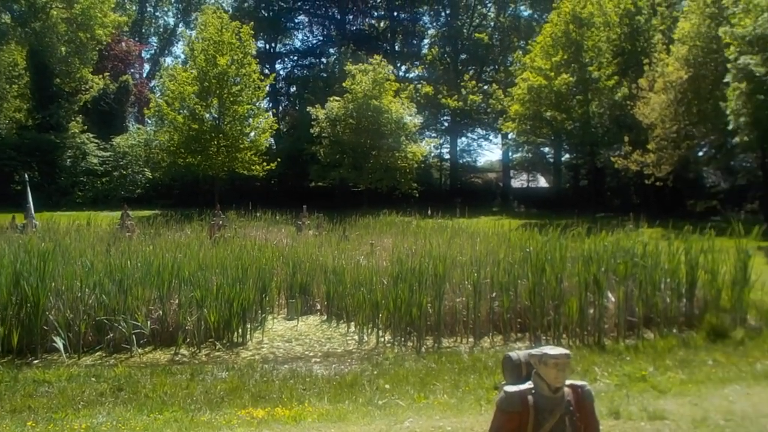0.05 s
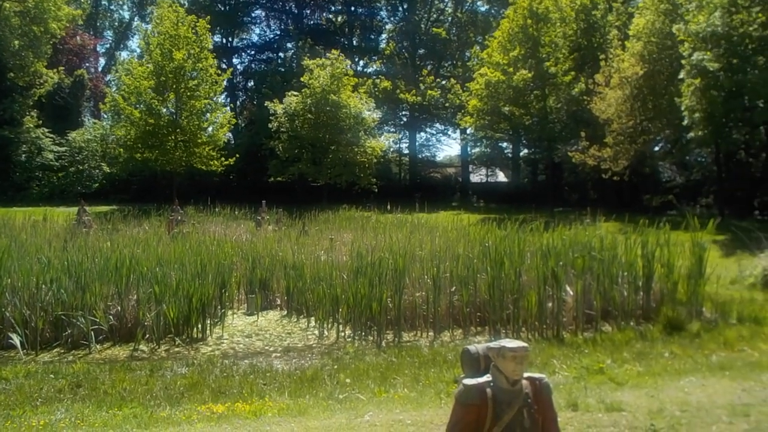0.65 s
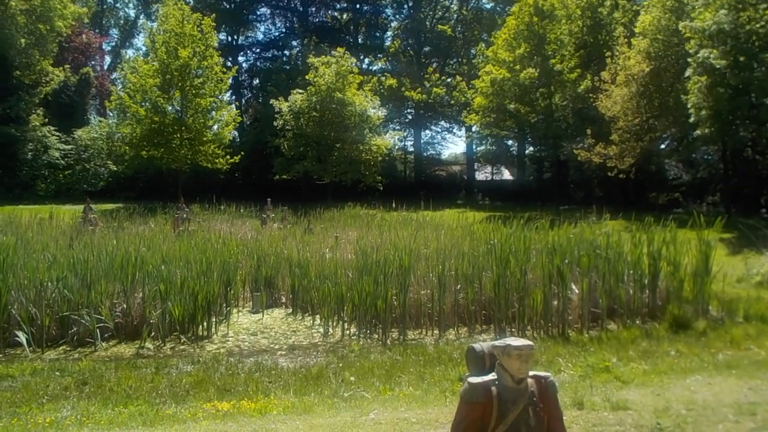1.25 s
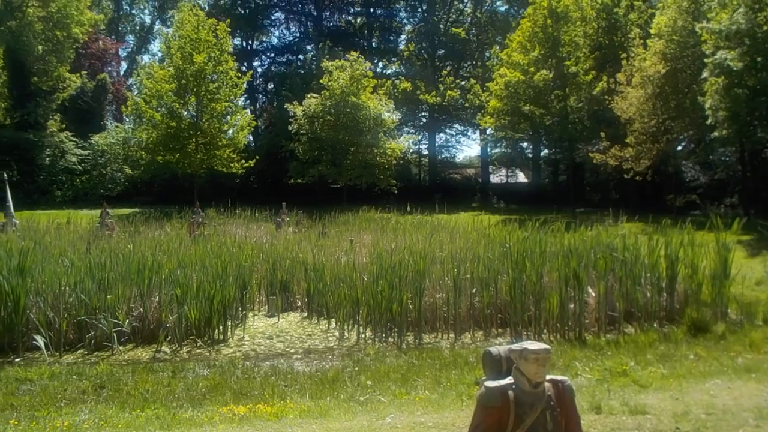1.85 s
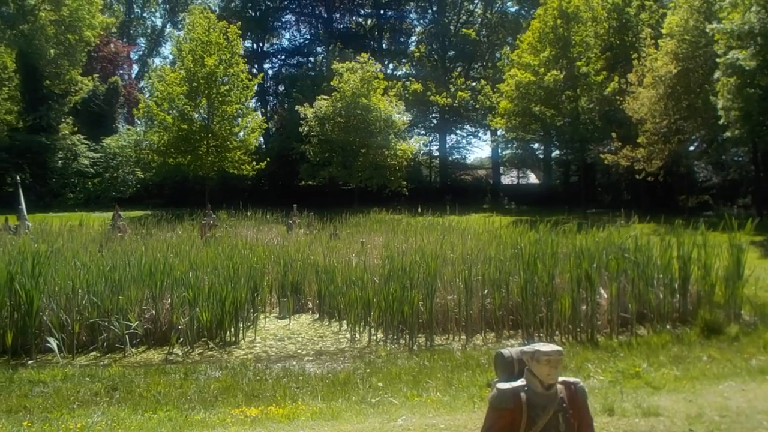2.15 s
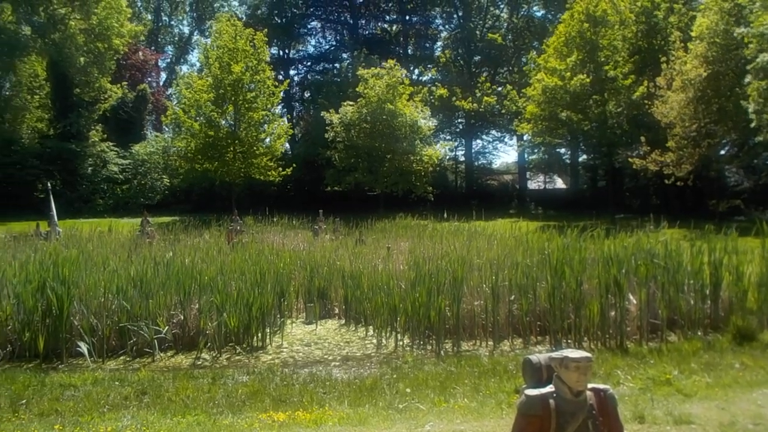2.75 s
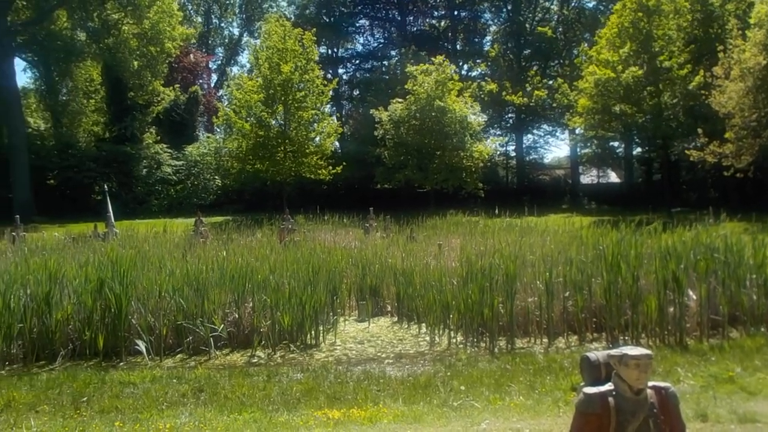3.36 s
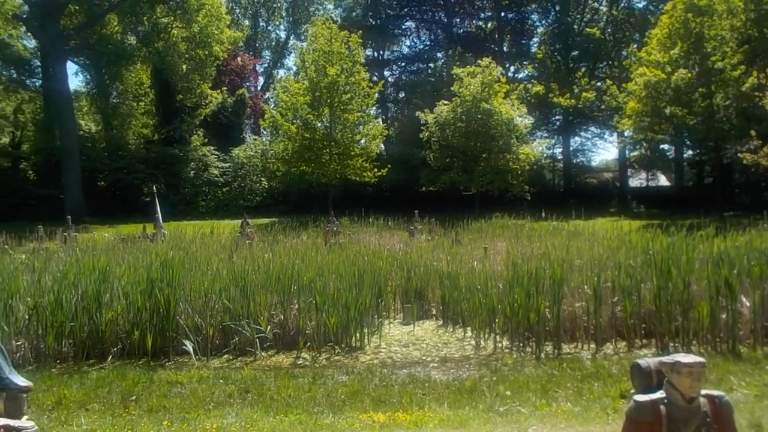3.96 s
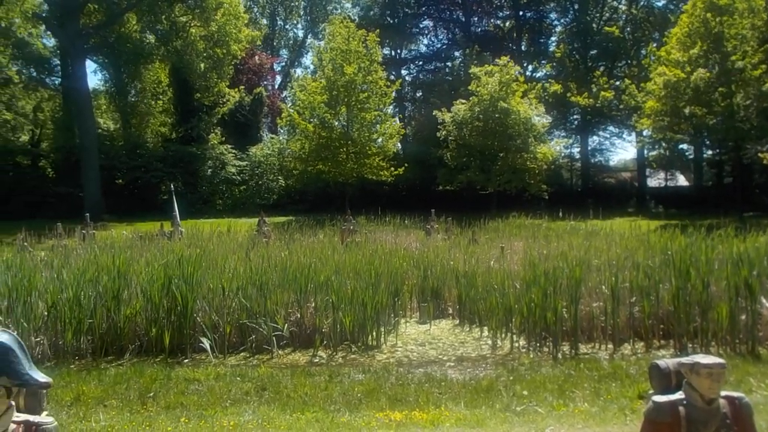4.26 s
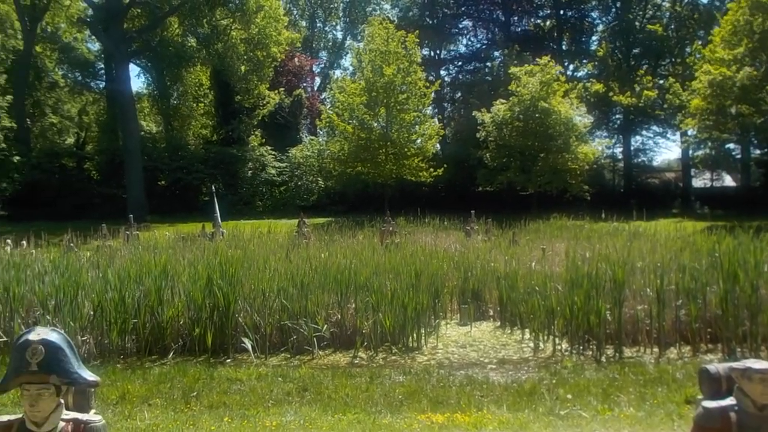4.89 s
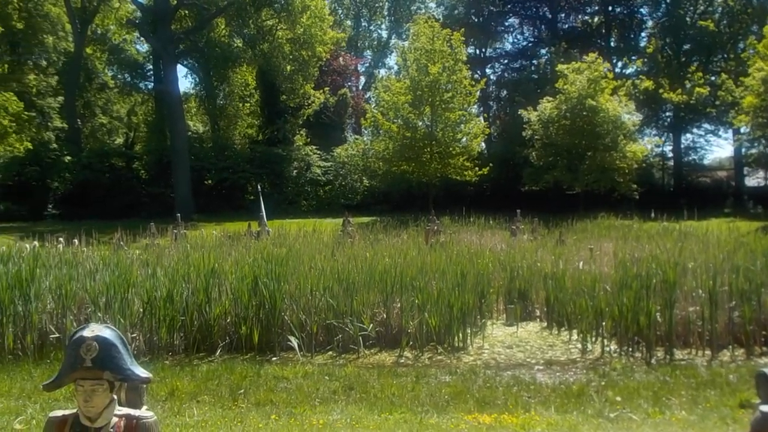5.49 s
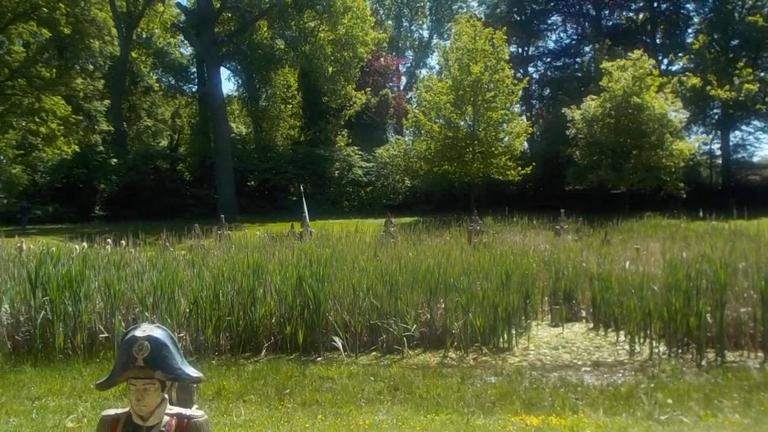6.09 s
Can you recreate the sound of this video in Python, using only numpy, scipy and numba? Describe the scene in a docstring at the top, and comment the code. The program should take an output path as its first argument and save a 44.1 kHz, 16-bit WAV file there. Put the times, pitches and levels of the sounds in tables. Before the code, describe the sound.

Short frog croaks and clicking calls come from the reeds, with a few dry snaps and faint birdsong in the trees.

```python
"""Frogs at a park pond

Frogs croak in the reeds: trains of larynx pulses that slow as the ring of the vocal sac rises.
Lone pulses come out as clicks, and a few dry snaps crack close by. In the trees behind, small birds
give sliding whistles, louder arched calls and faint twitter. Reeds and tree line scatter every call
over a bed of distant wash and microphone hiss."""
import sys
import numpy as np
from scipy import signal
from scipy.fft import rfft, irfft
from scipy.io import wavfile
from scipy.ndimage import uniform_filter1d
from numba import njit

SR = 44100
rng = np.random.default_rng(int(sys.argv[2]) if len(sys.argv) > 2 else 0)


def transcribe(signal):
    """Save signal, clipped to [-1, 1], as a 16-bit WAV file at the path in sys.argv[1]."""
    frames = np.atleast_2d(signal).T
    limited = np.clip(frames, -1, 1)
    pcm = np.round(limited * 32767).astype(np.int16)
    wavfile.write(sys.argv[1], SR, pcm)


N = 270342

# Frog croaks. Each row: crest in seconds, swell and fade in seconds, level in dB, pulse rate and sac
# ring at the crest in Hz, rise of the ring either side of it in octaves, drop within each throb in dB.
CROAKS = [(.006, .04, 0.025, -35.5, 403, 1354, 0.38, 0.5), (.441, .055, 0.031, -45, 268.5, 1340, 0.32, 1),
          (1.057, .045, 0.094, -44, 440, 1440, .27, 24), (1.842, .075, 0.046, -47, 300.4, 1270, .26, 0),
          (2.096, .046, .017, -46.5, 258, 1430, .35, 2), (2.452, .15, 0.043, -52.5, 128.9, 1440, .2, 6),
          (4.047, .005, 0.017, -42.5, 386.5, 1150, 0.31, -4),
          (4.096, 0.028, 0.028, -36.5, 384.4, 1367, .42, 2),
          (4.772, .072, 0.069, -44, 330.4, 1325, 0.27, 5.5), (5.093, .03, 0.017, -42.5, 568, 966, 0.057, 3)]
# Lone frog clicks. Each row: start in seconds, relative peak in dB, sac ring in Hz.
CLICKS = [(0.9502, -42, 1960), (1.1255, -41, 1650), (1.1364, -34.5, 1610), (1.1952, -41.5, 1910),
          (1.2615, -39, 1570), (2.1281, -38.5, 1520), (2.164, -31.5, 1550), (2.1968, -33.5, 1430),
          (2.3033, -35.5, 1540), (2.3994, -43, 1480), (2.4952, -39.5, 1560), (2.5142, -40.5, 1530),
          (2.575, -42.5, 1570), (2.6504, -44.5, 1610), (2.7124, -38.5, 1560), (2.7681, -42.5, 1610),
          (2.801, -38.5, 1490), (4.1232, -38, 1560)]
# Close, dry snaps. Each row: start in seconds, relative level in dB, treble lift in dB.
SNAPS = [(0.8151, 12.5, -16), (0.8159, 4.5, -5.5), (.8185, -18, -6), (.837, -1, -9), (.872, 3.5, -17),
         (0.8743, 6.5, -29), (1.0945, -10.5, -3), (1.0995, -12, 3.5)]
# The body of a snap. Each row: resonance in Hz, width in Hz, gain in dB.
SNAP_MODES = [(1630, 110, -11), (1880, 88, 1.5), (3040, 300, -3), (3500, 430, -16), (4200, 250, -4),
              (5200, 120, -2.5), (6160, 300, -36)]
# Arched calls of a nearer bird. Each row: start and length in seconds, top pitch in Hz,
# relative level in dB, warble from 0 to 1.
ARCHES = [(4.017, 0.097, 4380, -47, 0.72), (4.225, .104, 4236, -47.5, 0.69), (4.439, .09, 4586, -53, 0.27),
          (6.074, 0.14, 4290, -48, 0.71)]
# Sliding whistles. Each row: start and length in seconds, landing pitch in Hz, relative level in dB,
# opening pitch in octaves above the landing, warble from 0 to 1.
WHISTLES = [(0, 0.032, 4230, -57, 0.013, 0.3), (.004, .022, 4730, -60.5, .02, .4),
            (0.076, 0.03, 4240, -57.5, -.14, 0.23), (0.194, .13, 4060, -69.5, .01, 0.22),
            (0.883, 0.051, 4610, -59.5, -.2, 0.04), (1.031, 0.11, 4610, -64.5, .2, .15),
            (1.134, 0.072, 4270, -59, -.17, 0.13), (1.25, 0.096, 4705, -64.5, -0.02, 0.11),
            (1.38, .082, 4270, -63, -.24, 0.02), (2.336, 0.058, 3346, -64, 0.017, .1),
            (2.389, 0.215, 4245, -62, -0.055, 0.05), (2.669, 0.094, 3100, -70.5, 0.06, 0.37),
            (2.74, 0.17, 2650, -72.5, 0.034, 0.04), (3.068, 0.043, 3740, -62, 0.24, 0.88),
            (3.264, .018, 4480, -63, 0.107, .1), (3.276, 0.06, 3430, -58.5, 0.054, 0.94),
            (3.3, 0.23, 1916, -65, .12, 0.53), (3.451, 0.053, 2790, -63.5, .23, .8),
            (3.554, 0.058, 4450, -66.5, -0.0061, 0.88), (3.819, 0.073, 2243, -59, -0.084, 0.1),
            (4.464, 0.089, 4550, -54, -.01, 0.3), (4.622, 0.13, 3900, -63, -.06, 0.82),
            (4.834, 0.092, 5590, -68.5, 0.066, 0.66), (4.968, 0.066, 5450, -59.5, 0.14, 0.8),
            (5.053, 0.093, 3880, -63.5, 0.16, 0.45), (5.233, 0.059, 5840, -61, 0.033, .1),
            (5.546, 0.041, 6620, -64, 0.059, 0.6)]
# Bouts of twitter deep in the wood. Each row: start and length in seconds, centre pitch in Hz,
# spread either way in Hz, reverb send in dB.
TWITTER = [(0, 0.18, 4490, 347, -75), (0.948, 0.5, 4600, 600, -83), (2.1, 1.5, 4315, 548, -75),
           (3.6, 0.53, 4380, 463, -67), (4.03, 0.17, 4530, 403, -57.5), (4.28, 0.17, 3840, 652, -57),
           (4.448, 0.45, 3973, 673, -63), (4.851, 1.1, 4325, 700, -65.5), (4.8, .6, 5900, 810, -65.5),
           (5.5, 0.2, 6190, 800, -64)]
# Tone of the distant wash. Each row: frequency in Hz, relative level in dB.
WASH_EQ = [(25, -40), (60, -35.5), (110, -30.5), (200, -22), (310, -13.5), (480, -3.5), (720, 2.5),
           (1050, -0.5), (1550, -12.5), (2200, -11.5), (2700, -25.5), (4400, -20), (6200, -31),
           (9000, -45.5)]
# Tone of the microphone hiss. Each row: frequency in Hz, relative level in dB.
HISS_EQ = [(1000, -41), (6500, -4), (8200, -28.5), (8800, -4), (10000, -0.5), (15500, 2)]
# Treble notch of the recorder. Each row: frequency in Hz, gain in dB.
RECORDER_EQ = [(6300, 0), (7000, -9.5), (7500, -19), (8100, -8.5), (8700, -6), (9500, -2)]

SAC_RISE_S = 0.055  # the sac tightens over about this time either side of the crest
SLOWING = 1.8  # octaves the pulse rate falls for each octave the ring rises
ROUGH_HZ, THROB_HZ = 115, 31.26  # pulse rate at which a croak is fully rough; throbs per second
WARBLE_HZ, WARBLE_DEPTH = 33, 0.0587  # vibrato rate; full depth as a share of the pitch


def croaks():
    """Each croak swells, throbs and fades; the tightening sac rings higher as pulses slow and roughen."""
    out = np.zeros(N)
    for crest_s, swell_s, fade_s, db, rate_hz, sac_hz, rise_oct, throb_db in CROAKS:
        t = np.arange(-int(2 * swell_s * SR), int(2 * fade_s * SR)) / SR
        jitter, shimmer = rng.standard_normal((400, 2)).T  # timing and strength of each pulse
        tension = rise_oct * np.tanh(t / SAC_RISE_S)
        pulse_hz = rate_hz * 2 ** (-SLOWING * tension)
        cycles = np.cumsum(pulse_hz) / SR
        beats = np.arange(min(int(cycles[-1]), len(jitter)))
        rough = np.minimum(ROUGH_HZ / np.interp(beats, cycles, pulse_hz), 1) ** 1.5
        onsets = np.interp(beats + 0.36 * rough * jitter[beats], cycles, np.arange(len(t))).astype(int)
        pulses = np.zeros(len(t))
        pulses[onsets] = undb(8.1 * rough * shimmer[beats])
        throb = undb(-throb_db * (THROB_HZ * t % 1))  # sawtooth tremolo
        voice = vocal_sac(pulses * throb, sac_hz * 2 ** tension,
                          width_hz=148, upper_ratio=1.64, upper_db=-15, throat_db=-14)
        envelope = np.exp(-1.3 * (t / np.where(t < 0, swell_s, fade_s)) ** 2)
        add(out, crest_s + t[0], undb(db) * unit(voice * envelope) * np.sqrt(np.mean(envelope ** 2)))
    return out


def clicks(gain_db):
    """Lone larynx pulses ring the sac for a few milliseconds."""
    out = np.zeros(N)
    pulse = signal.unit_impulse(SR // 40)
    for start, db, hz in CLICKS:
        click = vocal_sac(pulse, hz, width_hz=235, upper_ratio=1.584, upper_db=-6, throat_db=-10)
        add(out, start, undb(db + gain_db) * click / np.abs(click).max())
    return out


def vocal_sac(pulses, hz, width_hz, upper_ratio, upper_db, throat_db):
    """The frog's resonator: a main ring, a weaker mode above it and a throat resonance below."""
    upper = undb(upper_db) * ring(pulses, np.minimum(upper_ratio * hz, 2250), 170)
    throat = undb(throat_db) * ring(pulses, 594, 180)
    voice = ring(pulses, hz, width_hz) - upper - throat
    return signal.sosfilt(signal.butter(4, [300, 2500], "bandpass", fs=SR, output="sos"), voice)


def snaps(gain_db, crack_s, crack_db, lowpass_hz):
    """Dry snaps so close that each channel gets its own crack, ringing a few well-damped modes."""
    out = np.zeros((2, N))
    t = np.arange(SR // 30) / SR
    for channel in out:
        for start, db, treble_db in SNAPS:
            grit = undb(crack_db) * rng.standard_normal(len(t)) * np.exp(-t / crack_s)
            crack = signal.unit_impulse(len(t)) + grit
            body = sum(undb(mode_db + treble_db * (hz > 2500)) * ring(crack, hz, width_hz)
                       for hz, width_hz, mode_db in SNAP_MODES)
            add(channel, start, undb(db + gain_db) * body)
    return signal.sosfilt(signal.butter(3, lowpass_hz, fs=SR, output="sos"), out)


def arched_calls(rise_s, fall_s, sweep_oct, db_per_oct):
    """A warbling call sweeps up, holds at the top, where it is loudest, and sweeps down again."""
    out = np.zeros(N)
    for start, length, top_hz, db, warble in ARCHES:
        t = np.arange(int(length * SR)) / SR
        arch = np.minimum(t / rise_s, (length - t) / fall_s)
        below_oct = sweep_oct * (1 - np.minimum(arch, 1))
        add(out, start, undb(db - db_per_oct * below_oct) * syrinx(top_hz * 2 ** -below_oct, warble))
    return out


def whistles(rise_curve, fall_curve):
    """Each whistle slides onto its pitch: a quick scoop up, or a fall that takes the whole note."""
    out = np.zeros(N)
    for start, length, landing_hz, db, slide_oct, warble in WHISTLES:
        curve = rise_curve if slide_oct < 0 else fall_curve
        bend_oct = slide_oct * np.linspace(1, 0, int(length * SR)) ** curve
        add(out, start, undb(db) * syrinx(landing_hz * 2 ** bend_oct, warble))
    return out


def syrinx(hz, warble):
    """A bird's voice: a soft-edged sine on a pitch path, with a slightly unsteady vibrato."""
    t = np.arange(len(hz)) / SR
    vibrato = np.cos(2 * np.pi * WARBLE_HZ * t) + drift(400, SR // 2)[:len(t)] / 3
    phase = 2 * np.pi * np.cumsum(hz * (1 + warble * WARBLE_DEPTH * vibrato)) / SR
    return np.sqrt(2) * signal.windows.tukey(len(t), 0.3) * np.sin(phase)


def twitter(chirps_per_s, slide_hz, range_db):
    """Far birds blur into clouds of faint, quick chirps, each sliding up or down."""
    out = np.zeros(N)
    for start, length, centre_hz, spread_hz, db in TWITTER:
        bout = np.zeros(N)
        chirps = rng.random((300, 5))[:int(length * chirps_per_s)]
        for slot, (delay, pitch, slide, span, softness) in enumerate(chirps):
            ramp = np.linspace(-1, 1, int(SR * (0.0108 + 0.0327 * span)))
            hz = centre_hz + spread_hz * (2 * pitch - 1) + slide_hz * (2 * slide - 1) * ramp
            chirp = (1 - ramp ** 2) * np.sin(2 * np.pi * np.cumsum(hz) / SR)
            add(bout, start + (slot + delay) / chirps_per_s, undb(-range_db * softness) * chirp)
        out += undb(db) * unit(bout) * np.sqrt(length * SR / N)
    return out


def leaves(song, flutter_hz, depth_db):
    """Moving leaves make the echo of a call flutter and blur its pitch."""
    return song + undb(depth_db) * song * drift(flutter_hz, N)


def scatter(send, t60, tail_db, early_s, early_db, spread):
    """Outdoor stereo reverb: quick reflections off the reeds, a long thin tail off the tree line."""
    t = np.arange(SR) / SR
    noise = rng.standard_normal((3, SR))
    stereo = (noise[0] + spread * noise[1:]) / np.sqrt(SR * (1 + spread ** 2))
    tail = unit(undb(-60 * t / t60) * (1 - np.exp(-t / 0.022)))
    early = unit(np.exp(-t / early_s) * (1 - np.exp(-t / 0.006)))
    response = stereo * (undb(tail_db) * tail + undb(early_db) * early)
    return signal.fftconvolve(send[None], response, axes=1)[:, :N]


def wash(level_db, flicker_db, side_db, high_side_db):
    """Far-off murmur of traffic and leaves, wavering a little in the mids, with a faint hum in it."""
    mid = colour(rng.standard_normal(N), WASH_EQ)
    for hz in (525, 665, 1000, 1500):
        mid += (undb(flicker_db * drift(9, N)) - 1) * ring(mid, hz, hz / 2)
    side = unit(colour(rng.standard_normal(N), WASH_EQ))
    side = colour(side, [(100, -8), (400, side_db), (1100, side_db), (3000, high_side_db)])
    hum = undb(-72) * unit(ring(rng.standard_normal(N), 479.5, 13.5))
    width = undb(level_db) * np.array([side, -side])
    return pan(undb(level_db) * unit(mid) + hum, left_db=3.28) + width


def hiss(level_db):
    """Self-noise of the microphone, partly shared by both channels."""
    noise = colour(rng.standard_normal((3, N)), HISS_EQ)
    return pan(undb(level_db) * unit(noise[1:] + 0.57 * noise[0]), left_db=0.98)


def undb(db):
    """Decibels to gain."""
    return 10 ** (np.asarray(db) / 20)


def unit(x):
    """Scale to rms 1."""
    return x / np.sqrt(np.mean(x ** 2) + 1e-20)


def add(track, start_s, sound):
    """Drop a sound onto a track at its cue."""
    at = int(round(start_s * SR)) + np.arange(len(sound))
    inside = (at >= 0) & (at < N)
    track[at[inside]] += sound[inside]


def pan(x, left_db):
    """Mono to stereo, with the left louder by left_db."""
    return x * undb(np.array([[left_db], [-left_db]]) / 2)


def drift(rate_hz, size):
    """Smooth random modulation with a spread near 1."""
    position = np.arange(size) * rate_hz / SR
    knots = rng.standard_normal(int(position[-1]) + 2)
    path = np.interp(position, np.arange(len(knots)), knots)
    return uniform_filter1d(path, max(int(SR / rate_hz / 2), 1)) * np.sqrt(2)


def colour(x, points):
    """Equalise a track along a curve of (Hz, dB) points."""
    hz, db = np.transpose(points)
    bins = np.maximum(np.fft.rfftfreq(N, 1 / SR), 1)
    return irfft(rfft(x) * undb(np.interp(np.log(bins), np.log(hz), db)), N)


def ring(x, hz, width_hz):
    """One resonance, steady or gliding."""
    return bandpass(x, np.clip(hz * np.ones(len(x)), 20, SR / 3), float(width_hz))


@njit
def bandpass(x, hz, width_hz):
    """State-variable band-pass with a moving centre."""
    out = np.empty(len(x))
    band_state = low_state = 0.0
    for i in range(len(x)):
        tuning, damping = np.tan(np.pi * hz[i] / SR), width_hz / hz[i]
        band = (band_state + tuning * (x[i] - low_state)) / (1 + tuning * (tuning + damping))
        band_state = 2 * band - band_state
        low_state += 2 * tuning * band
        out[i] = damping * band
    return out


def scene():
    """The mix: frogs in the reeds a little to the left, birds in the trees ahead, air underneath."""
    air = wash(level_db=-51, flicker_db=1.0, side_db=-20.5, high_side_db=-7.5) + hiss(level_db=-63.5)
    near = snaps(gain_db=-7.5, crack_s=0.0012, crack_db=-13, lowpass_hz=10500)
    frogs = croaks() + clicks(gain_db=2.0)
    pond_echo = scatter(frogs + near[0], t60=0.92, tail_db=-16, early_s=0.0082, early_db=-9, spread=0.74)
    pond = pan(frogs + near + pond_echo, left_db=2.2)
    song = whistles(rise_curve=3.21, fall_curve=1.25)
    calls = arched_calls(rise_s=0.019, fall_s=0.028, sweep_oct=0.6, db_per_oct=19)
    send = leaves(song, flutter_hz=300.2, depth_db=-9.5) + leaves(calls, flutter_hz=495, depth_db=-5)
    send += twitter(chirps_per_s=120, slide_hz=400, range_db=19)  # heard only by way of the trees
    bird_echo = scatter(send, t60=1.0, tail_db=-4.5, early_s=0.014, early_db=-5, spread=0.67)
    birds = pan(undb(-1) * song + undb(-5) * calls, left_db=0.33) + bird_echo
    return pond + birds + air


def record(dry):
    """The recorder notches the treble around 7.5 kHz and cuts the top above 15.8 kHz."""
    top_cut = signal.ellip(10, 0.2, 70, 15800, fs=SR, output="sos")
    return signal.sosfilt(top_cut, colour(dry, RECORDER_EQ))


dry = scene()
out = record(dry)
transcribe(out)
```